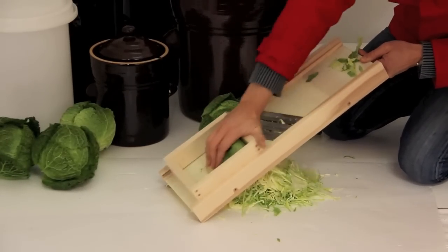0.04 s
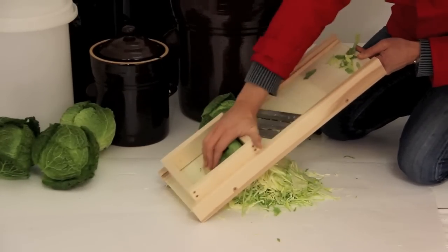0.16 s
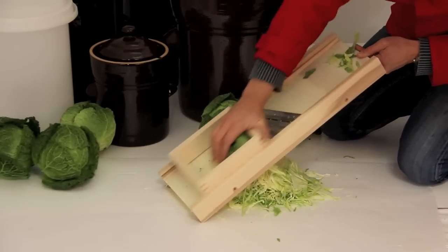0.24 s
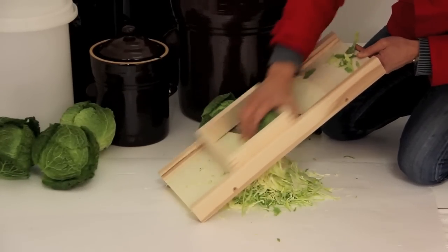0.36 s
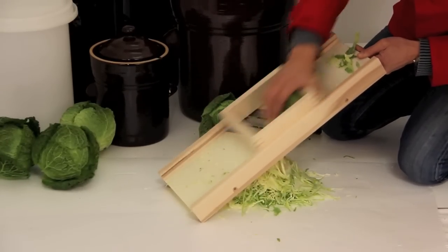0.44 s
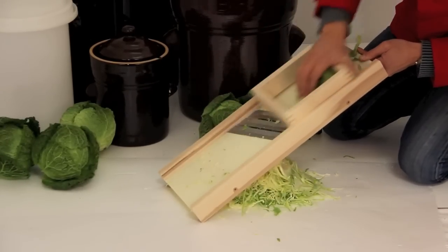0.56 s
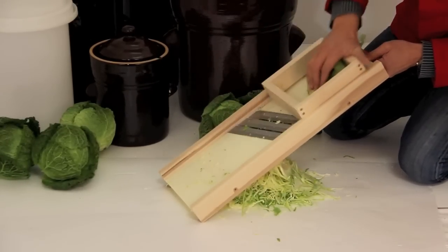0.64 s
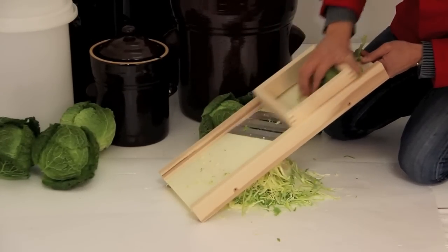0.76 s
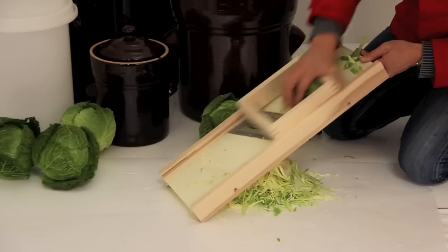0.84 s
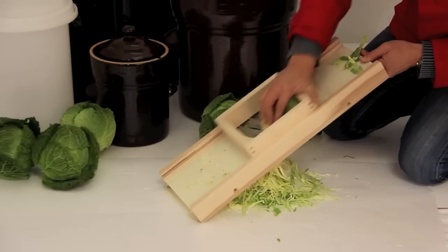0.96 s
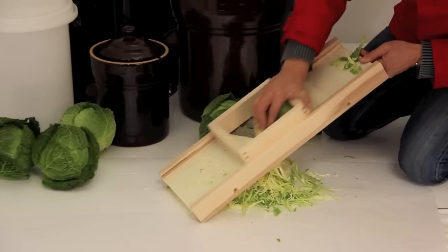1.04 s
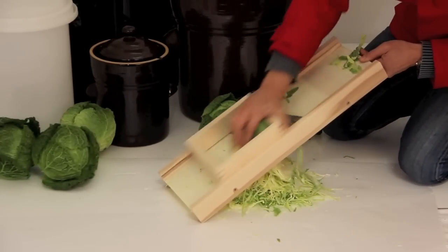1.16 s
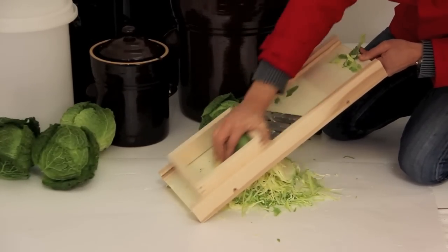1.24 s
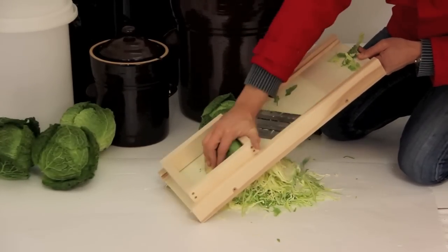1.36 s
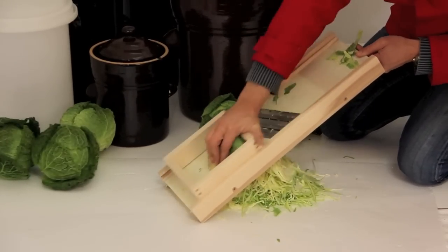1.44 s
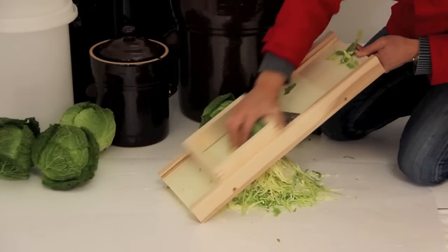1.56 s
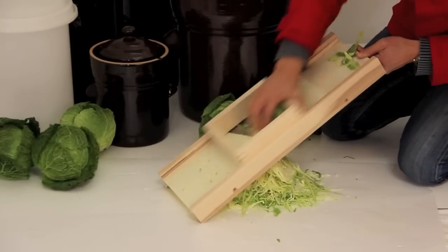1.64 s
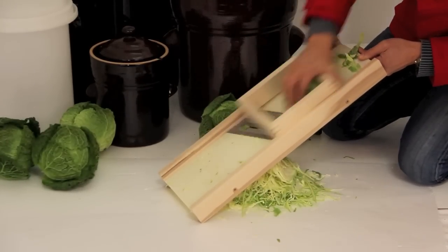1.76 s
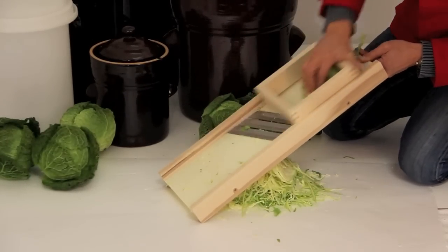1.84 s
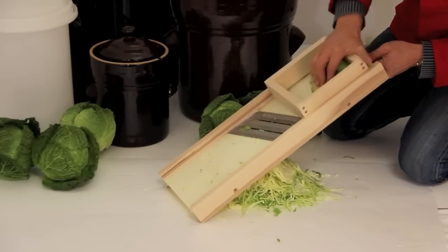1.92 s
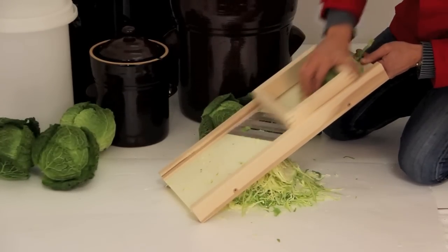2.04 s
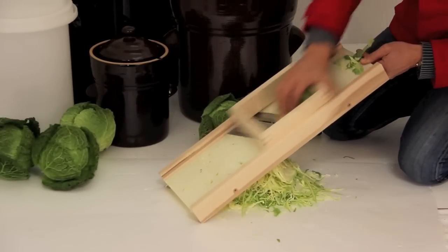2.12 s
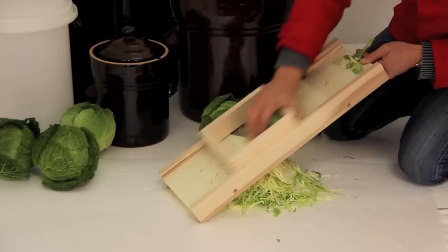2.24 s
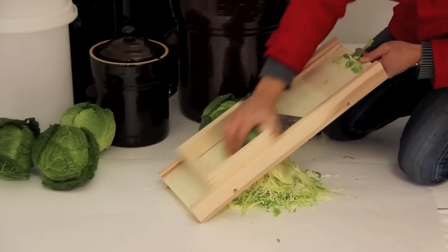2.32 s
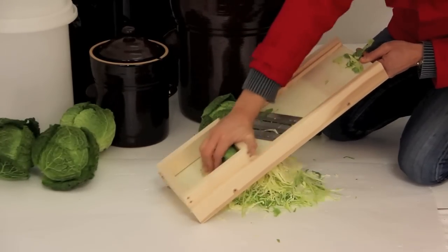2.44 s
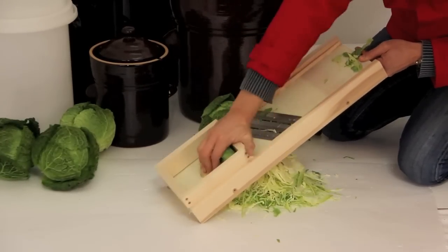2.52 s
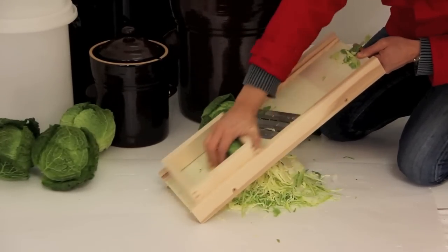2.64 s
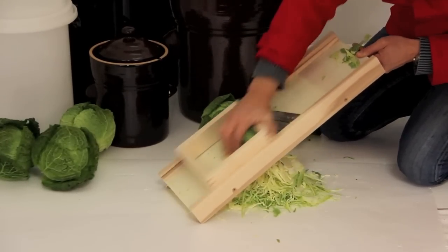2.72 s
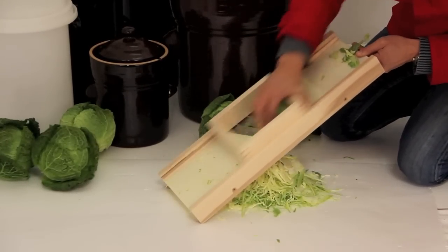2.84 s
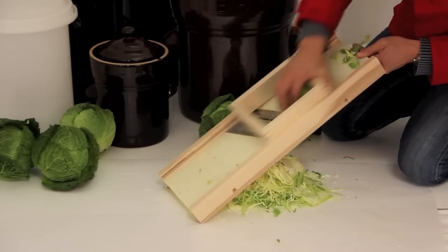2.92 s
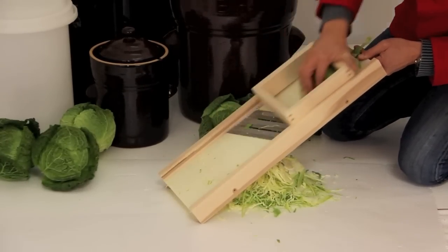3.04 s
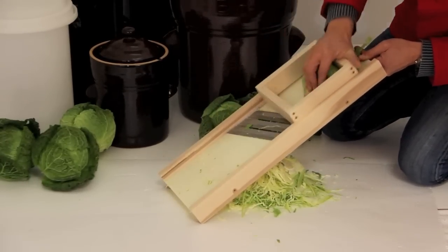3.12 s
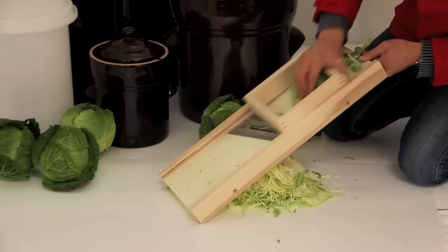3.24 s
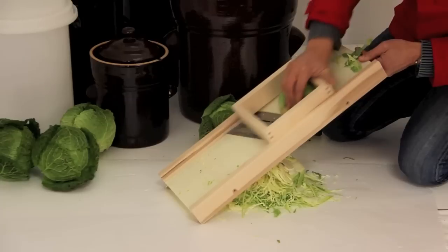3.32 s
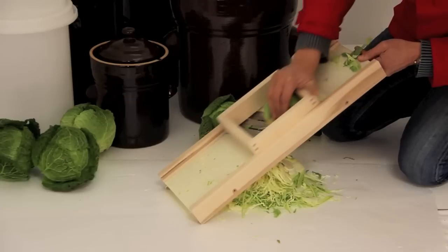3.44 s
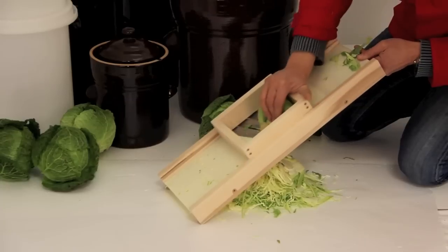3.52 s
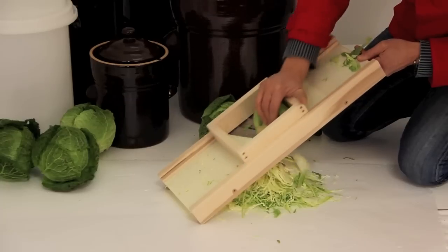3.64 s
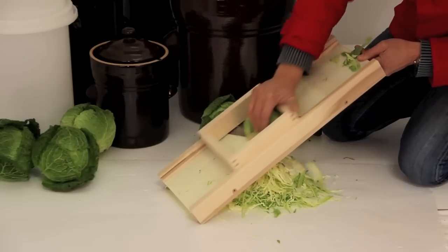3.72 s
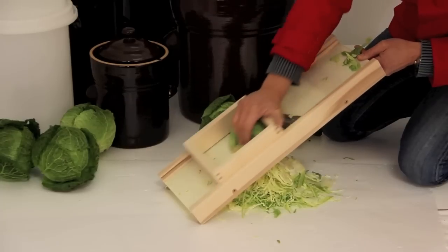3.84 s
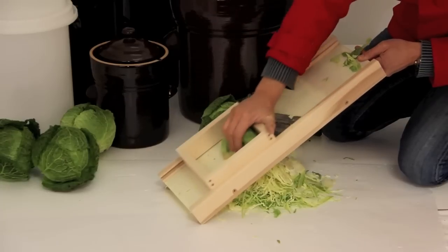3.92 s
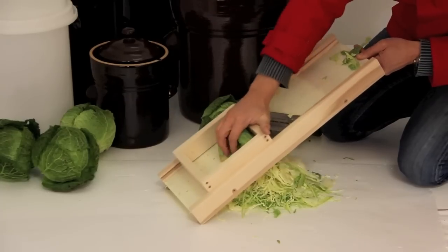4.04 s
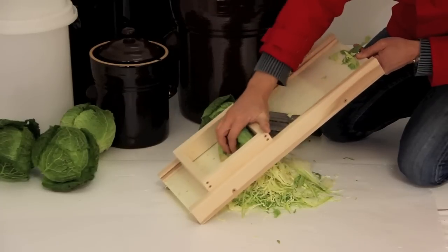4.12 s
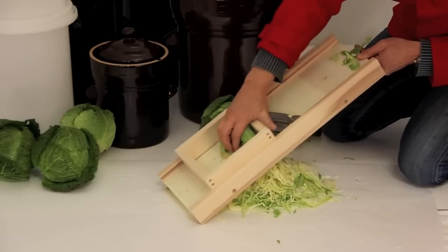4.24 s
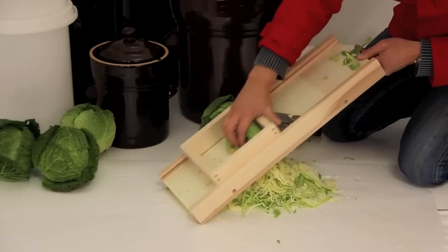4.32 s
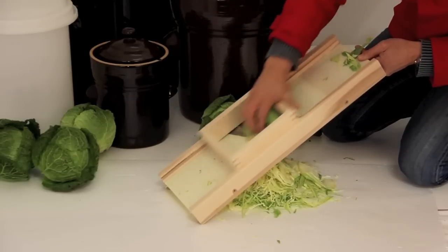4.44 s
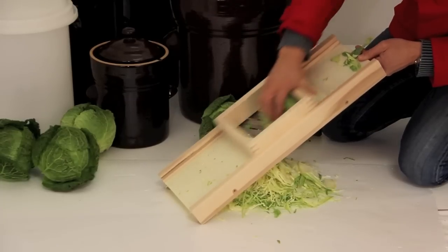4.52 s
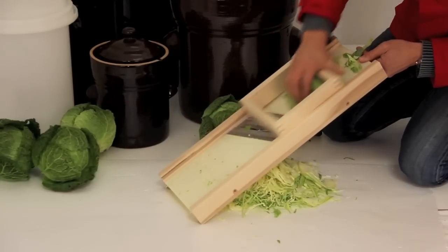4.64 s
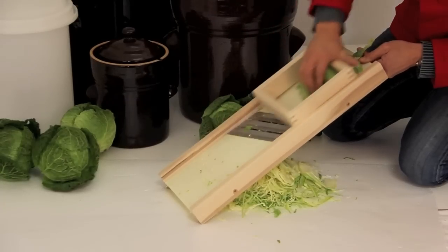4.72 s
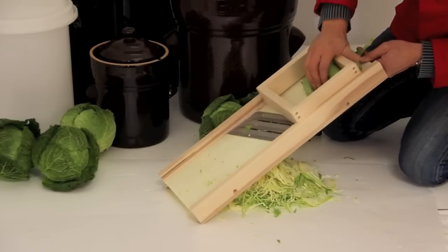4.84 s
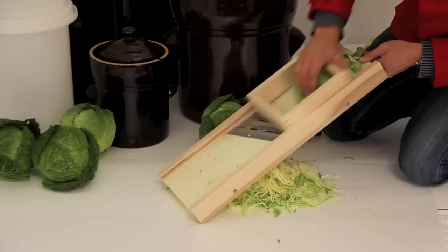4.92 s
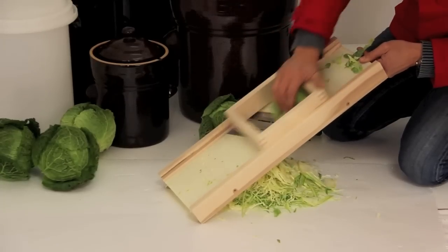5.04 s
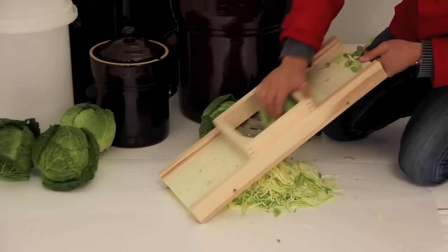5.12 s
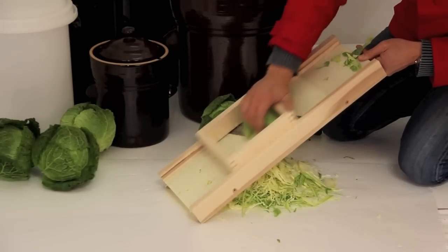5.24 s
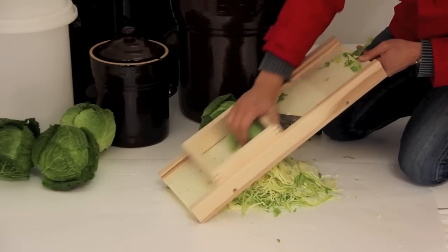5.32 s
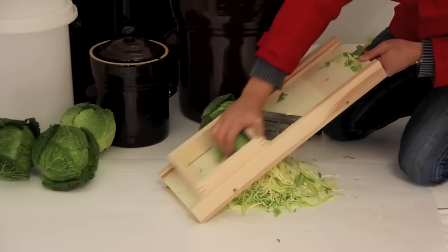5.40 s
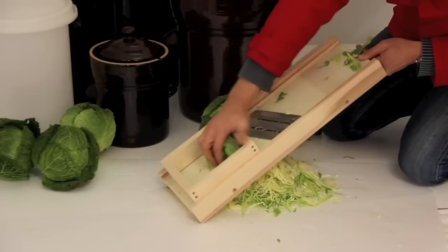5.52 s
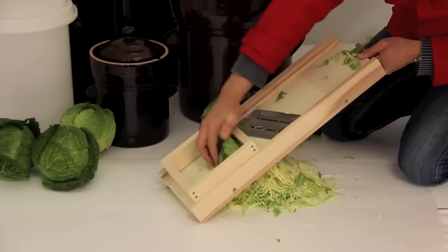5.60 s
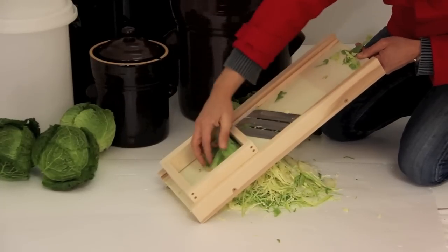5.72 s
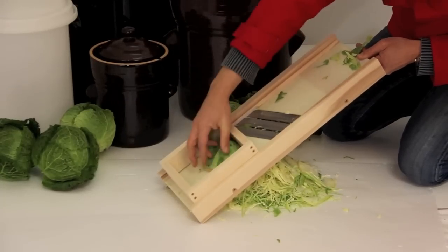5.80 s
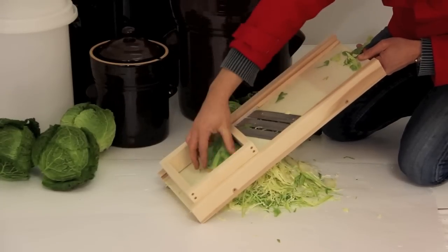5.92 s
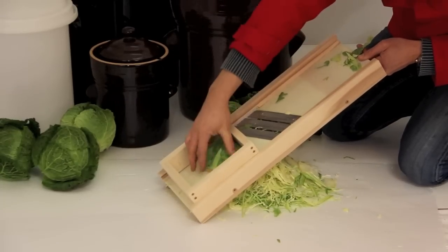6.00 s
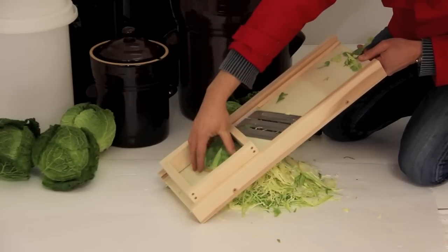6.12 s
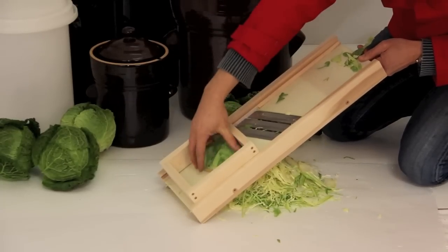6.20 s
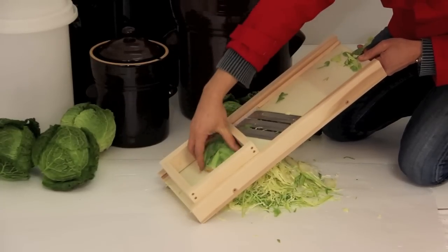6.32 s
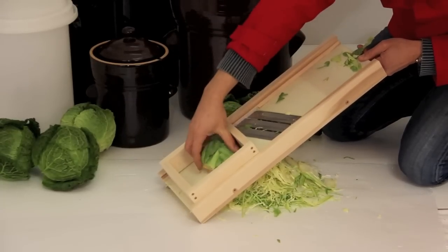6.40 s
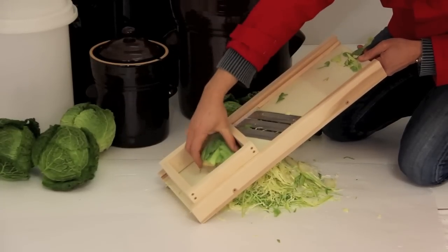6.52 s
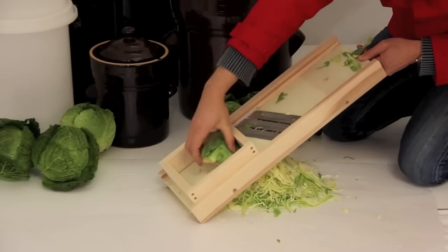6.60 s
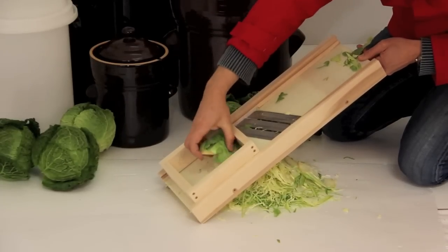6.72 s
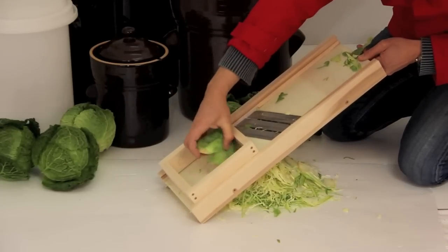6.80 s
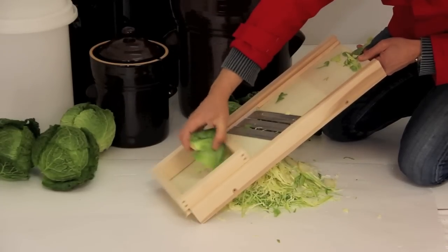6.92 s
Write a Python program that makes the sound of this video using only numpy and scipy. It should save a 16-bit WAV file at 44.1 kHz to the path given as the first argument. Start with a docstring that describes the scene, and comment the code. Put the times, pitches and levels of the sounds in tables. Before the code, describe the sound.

A cabbage is rasped back and forth on a wooden slicer board, crisp tearing cuts with sharp snaps, then quiet light knocks at the end.

```python
"""Slicing cabbage on a slanted board

A cabbage head in a wooden carriage slides up and down a slicer board in a small hard room.
Friction noise rings the rails, blades, leaves and foot; ribs snap and fibres tick as decaying bursts.
Scraped bands, a gliding leaf squeak and low shudders join in; at the end a hand turns the head over.
Noise lines and a mains tone make the appliance hum behind."""
import sys
import numpy as np
from scipy import signal
from scipy.fft import rfft, irfft, next_fast_len
from scipy.io import wavfile
from scipy.ndimage import uniform_filter1d, map_coordinates

SR = 44100
rng = np.random.default_rng(int(sys.argv[2]) if len(sys.argv) > 2 else 0)


def waveform_to_disk(signal):
    """Save audio, clipped to [-1, 1], as 16-bit WAV at the path in sys.argv[1]."""
    frames = np.transpose(np.atleast_2d(signal))
    scaled = np.clip(frames, -1, 1) * 32767
    samples = np.round(scaled).astype(np.int16)
    wavfile.write(sys.argv[1], SR, samples)


N = 306936  # length in samples
TOP_HZ = 15850  # band limit of the whole sound


def amp(db):
    """Gain of a level in dB."""
    return 10 ** (np.asarray(db) / 20)


def unit(x):
    """x at rms 1."""
    return x / np.sqrt(np.mean(x ** 2) + 1e-20)


def along(points, hz):
    """Read (frequency [Hz], value) points on a log frequency axis."""
    f, v = np.transpose(points)
    return np.interp(np.log(hz + 1), np.log(f + 1), v)


def curves(rows):
    """One value per sample for each column after the time."""
    s, *columns = np.transpose(rows)
    return [np.interp(np.arange(N) / SR, s, column) for column in columns]


def wobble(rate):
    """A smooth random curve, rate knots a second."""
    knots = rng.standard_normal(int(N * rate / SR) + 4)
    return map_coordinates(knots, [np.arange(N) * rate / SR])


def filtered(x, response):
    """x times a complex response of frequency."""
    m = next_fast_len(N + SR // 2)
    return irfft(rfft(x, m) * response(np.fft.rfftfreq(m, 1 / SR)), m)[:N]


def modes(table):
    """Causal response of a set of resonances, with alternating signs."""
    def response(f):
        return sum((-1) ** k * amp(db) * 1j * f * width / (hz * hz - f * f + 1j * f * width)
                   for k, (hz, width, db) in enumerate(table))
    return response


def friction(slips, spread_db, share, lumps_db):
    """Tiny slips of unequal size, slips a second, over a smooth rub; the pressure comes in lumps."""
    draw = rng.random((3, N))
    size_db = np.minimum(-spread_db * np.log(draw[1] + 1e-9), 11)
    size = amp(size_db) * np.sign(draw[2] - .5)
    grains = unit((draw[0] < slips / SR) * size)
    share = np.clip(share, 0, 1)  # power share of the grains
    rub = np.sqrt(share) * grains + np.sqrt(1 - share) * rng.standard_normal(N)
    lumps = amp(lumps_db * (wobble(70) + wobble(25.02)))
    return unit(rub * lumps)


def crunches(rate, spread_db, t60):
    """Gain of a pressure that jumps as each rib gives way, then eases off."""
    draw = rng.random((2, N))
    size_db = np.minimum(-spread_db * np.log(draw[1] + 1e-9), 9)
    jumps = (draw[0] < rate / SR) * amp(size_db)
    ease = amp(-60 / (t60 * SR))
    return unit(np.sqrt(.5 + signal.lfilter([1], [1, -ease], jumps)))


def sliding(force, level_db, table, shift_db):
    """A moving contact drives each mode more or less, as it passes loops and nodes."""
    drive = force * amp(level_db)
    rings = []
    for k, row in enumerate(table):
        coupling = unit(amp(shift_db * wobble(24)))
        rings.append((-1) ** k * filtered(drive * coupling, modes([row])))
    return sum(rings) / np.std(filtered(force, modes(table)))


def played(force, level_db, response):
    """The force, at its level, set ringing in a body."""
    scale = np.std(filtered(force, response))
    return filtered(force * amp(level_db), response) / scale


def joined(tables, catch=.007):
    """Tables in a row; each last level holds until catch seconds before the next table."""
    rows = []
    for this, after in zip(tables, tables[1:]):
        rows += [*this, (after[0][0] - catch, *this[-1][1:])]
    return rows + [*tables[-1]]


# One breakpoint list from each catch of the carriage or head to the next:
# (time [s], rasp on the rails [dB], tearing of the leaves [dB])
STROKE_CURVES = [
    [(0.0, -22.5, -33), (0.068, -36, -40.5), (0.262, -56.5, -71.5), (0.36, -46.5, -51.5)],
    [(0.385, -32, -37.5), (0.417, -30, -37), (0.445, -32, -45.5), (0.469, -28.5, -45), (0.55, -36, -49.5)],
    [(0.574, -28, -34.5), (0.592, -28, -39.5), (0.628, -33.5, -50.5), (0.78, -48, -61.5), (0.9, -48.5, -58)],
    [(0.925, -34.5, -58), (1.021, -42.5, -36), (1.041, -42.5, -30), (1.09, -35.5, -31),
     (1.125, -36.5, -35.5), (1.16, -35.5, -33), (1.303, -35, -37.5), (1.321, -32.5, -41), (1.355, -38, -52),
     (1.455, -44.5, -50.5), (1.475, -50.5, -64), (1.561, -49.5, -61), (1.585, -46, -53)],
    [(1.607, -38, -37), (1.655, -31, -36.5), (1.687, -34, -47), (1.869, -32, -48), (2.037, -54, -58.5),
     (2.073, -44.5, -75), (2.165, -49, -53), (2.2, -41, -52)],
    [(2.222, -47, -44), (2.294, -37, -30.5), (2.428, -35, -41.5), (2.454, -32, -45.5), (2.586, -48, -61.5),
     (2.63, -52.5, -71), (2.728, -46.5, -60), (2.79, -50, -55.5)],
    [(2.813, -37, -42), (2.855, -31.5, -45), (2.885, -37, -47.5), (3.079, -35, -50.5),
     (3.223, -55.5, -62.5), (3.278, -51, -62)],
    [(3.302, -36, -61), (3.34, -49, -60), (3.368, -41, -59)],
    [(3.395, -31, -64), (3.449, -39.5, -41), (3.513, -41, -46), (3.571, -42.5, -36), (3.655, -48, -44),
     (3.759, -40, -39), (4.005, -38, -48), (4.04, -46, -57.5), (4.161, -54.5, -63.5), (4.34, -55.5, -60.5)],
    [(4.368, -33.5, -64), (4.398, -43, -64), (4.572, -43.5, -52), (4.71, -34.5, -54.5),
     (4.904, -56.5, -61.5), (4.91, -52.5, -45.5), (4.946, -63, -64), (5.002, -48, -61.5),
     (5.104, -46.5, -61), (5.113, -41, -49)],
    [(5.131, -30.5, -44.5), (5.189, -37.5, -51.5), (5.211, -37.5, -42), (5.437, -36.5, -44),
     (5.455, -29, -45.5), (5.569, -46, -56.5), (5.677, -52, -61), (5.73, -55, -64)],
    [(5.77, -61, -57), (5.794, -49, -53), (5.854, -65, -63), (6.106, -65.5, -90), (6.496, -62.5, -66),
     (6.556, -57, -64), (6.58, -65, -62)],
    [(6.603, -49.5, -50), (6.673, -53.5, -52), (6.781, -58, -56), (6.801, -46.5, -59), (6.833, -59, -59),
     (6.89, -58, -49.5), (6.9, -43.5, -60), (6.943, -54, -48), (6.96, -54, -57)],
]
# How hard each stroke drives the other bodies, one row per list above, added to the growth below:
# (bite [dB], crunch [dB], drumming [dB], deep shake [dB])
STROKE_DRIVE = [(7, 2, -11, -9.5), (4.5, 3, -10.5, -10.5), (6.5, 1, -10, -10), (7.5, 2.5, -13, -9),
                (5, 1, -10.5, -9), (7, 2.5, -10, -8), (7, 4, -9, -11), (4, 3.5, -10, -18),
                (7, 1.5, -11, -9), (4.5, 2.5, -10, -9), (5.5, -0.5, -10, -7.5), (8.5, 6.5, -7.5, -10),
                (3.5, 3, -13.5, -23)]
# dB gained per dB of (rasp, tearing)
BITE_GROWS, CRUNCH_GROWS, DRUM_GROWS, SHAKE_GROWS = (0.67, 0.42), (0.41, 0.62), (0.77, 0.13), (0.48, 0.57)
FOOT_SMEAR_S = 0.044  # the heavy table follows the push slowly


def stroke_levels():
    """Rasp and tearing set all the other levels, each stroke with its own weight."""
    rasp_db, tear_db = curves(joined(STROKE_CURVES))
    starts = [rows[0][0] for rows in STROKE_CURVES[1:]]
    stroke = np.searchsorted(starts, np.arange(N) / SR)
    bite, crunch, drum, shake = np.transpose(STROKE_DRIVE)[:, stroke]

    def growth(grows):
        return grows[0] * rasp_db + grows[1] * tear_db

    def slow(db):
        return uniform_filter1d(db, size=max(int(FOOT_SMEAR_S * SR), 1))

    return dict(rasp=rasp_db, tear=tear_db,
                bite=bite + growth(BITE_GROWS), crunch=crunch + growth(CRUNCH_GROWS),
                drum=slow(drum + growth(DRUM_GROWS)), shake=slow(shake + growth(SHAKE_GROWS)))


# Lower wood resonances, rasped on the rails: (frequency [Hz], width [Hz], relative level [dB])
RAIL_MODES = [(377, 183, -11), (451.6, 51, -3), (523, 39, -3), (659, 65, -2.5), (702.4, 38.7, 3),
              (797, 185, 0.5), (876, 76, 1.5), (1030, 63, -6.5)]
# Higher board resonances, shaken by the blades: (frequency [Hz], width [Hz], relative level [dB])
BLADE_MODES = [(1125, 123, -4), (1285, 44, 4), (1344, 136, 2), (1457, 177, 3), (1683, 117, -0.5),
               (1934, 280, -5), (2278, 64, -6.5)]


def carriage(ribs, rasp_db, bite_db):
    """Wood chatters along the rails; the blades bite into the head and shake the board's higher modes."""
    chatter = ribs ** 0.27 * friction(900, spread_db=4.0, share=0.49, lumps_db=-0.78)
    cutting = ribs * friction(1200, spread_db=10.0, share=0.4, lumps_db=-0.07)
    rasp = sliding(chatter, rasp_db, RAIL_MODES, shift_db=2.0)
    bite = sliding(cutting, bite_db, BLADE_MODES, shift_db=1.5)
    return rasp + bite + scrapes(bite_db)


# The blades catch or the carriage jams, and one part of the board's range is scraped hard:
# (time [s], pitch [Hz], level before the fade [dB], t60 [s])
HARD_SCRAPES = [(.405, 1060, -24, 0.16), (.462, 667, -21, 0.15), (.8, 1700, -41, .12),
                (.95, 1390, -36, 0.42), (1.037, 1320, -16, 0.14), (1.068, 1410, -16.5, 0.08),
                (1.088, 1200, -19.5, .08), (1.305, 437, -32, 0.22), (2.217, 1360, -29, 0.39),
                (2.3, 2880, -29, 0.21), (2.44, 460, -26.5, 0.14), (2.558, 2900, -43, .1),
                (2.845, 605, -26, 0.26), (3.39, 1360, -31, 0.62), (3.395, 760, -26.5, 0.25),
                (3.985, 1400, -35.5, 0.54), (4.262, 4540, -55, 0.18), (4.365, 1310, -28, 0.11),
                (5.13, 750, -32, 0.29), (5.175, 710, -25.5, 0.09), (5.24, 554, -26.5, 0.13),
                (5.465, 2220, -32, 0.18), (5.47, 1340, -33, 0.22), (5.655, 654, -37.5, 0.22)]
SCRAPE_WIDTH, SCRAPE_RISE_S = 0.29, 0.0033  # band width over pitch; time constant of the rise
SHRED_RATE, SHRED_T60_S = 45, 0.028  # shreds a second, their fade
SHRED_HZ, SHRED_SPAN_DB = 1510, 5  # middle pitch; spread of pitch, as 20 log10 of the ratio
SHRED_DB = 4.5  # middle level over the bite


def scrapes(bite_db):
    """Quick-rising, fading rubs around a pitch; small ones come at random as shreds tear off and settle."""
    out, t = np.zeros(N + SR), np.arange(SR // 3) / SR
    f = np.fft.rfftfreq(len(t), 1 / SR)
    at = np.flatnonzero(rng.random(N) < SHRED_RATE / SR)
    pitch_draw, level_draw = rng.standard_normal((len(at), 2)).T
    shred_hz = SHRED_HZ * amp(SHRED_SPAN_DB * pitch_draw)
    shred_db = bite_db[at] + SHRED_DB + 3 * level_draw
    shreds = zip(at / SR, shred_hz, shred_db, [SHRED_T60_S] * len(at))
    for s, hz, db, t60 in [*HARD_SCRAPES, *shreds]:
        band = modes([(hz, SCRAPE_WIDTH * hz, 0)])(f) ** 2
        rub = unit(irfft(rfft(rng.standard_normal(len(t))) * band, len(t)))
        envelope = amp(db - 60 * t / t60) * (1 - np.exp(-t / SCRAPE_RISE_S))
        out[round(s * SR):][:len(t)] += envelope * rub
    return out[:N]


# Bright resonances of tearing leaves: (frequency [Hz], width [Hz], relative level [dB])
TEAR_MODES = [(4000, 1800, -0.5), (6760, 1530, 3.5), (9050, 4000, 1), (13800, 11500, -4)]
# Resonances of the firm core: (frequency [Hz], width [Hz], relative level [dB])
CORE_MODES = [(2420, 490, 2.5), (3560, 1800, -3.5)]


def leaves(ribs, tear_db, crunch_db):
    """Bursting cells: heard bare as tearing, and through the firm core as crunch."""
    tear = ribs ** 0.81 * friction(3000, spread_db=3.0, share=0.37, lumps_db=-0.44)
    crunch = ribs ** 0.82 * friction(1500, spread_db=1.5, share=0.36, lumps_db=1.13)
    tearing = sliding(tear, tear_db, TEAR_MODES, shift_db=1.5)
    return tearing + sliding(crunch, crunch_db, CORE_MODES, shift_db=1.5)


# Ribs snapping and wood knocking; push and crackle are relative to the snap, before fixed boosts:
# (time [s], snap level [dB], snap pitch [Hz], push on the board [dB], crackle [dB])
RIB_SNAPS = [(0.569, -15, 2560, -5, -11.5), (0.9193, -24.5, 4000, -6.5, -27), (1.037, -26, 3070, -1, -5),
             (1.0701, -16.5, 3170, -3, -3.5), (1.3061, -22.5, 2600, 4, -21), (1.603, -20, 6200, -18, -15),
             (1.816, -18, 3200, -7, -14), (1.8551, -11, 2470, -29, -17), (2.0706, -37.5, 3380, 3.5, -23),
             (2.2155, -21.5, 2950, 2, -16), (2.2983, -20, 2700, -11, -25), (2.309, -14, 2800, -10, -20),
             (2.4318, -15.5, 2570, -4, -12.5), (2.8391, -16, 3400, -4, -11), (2.9589, -18, 2850, -7, -17),
             (2.995, -18.5, 3480, 0.5, -9), (3.0339, -22.5, 2800, 1.5, -13.5),
             (3.0703, -13, 2840, -12.5, -20), (3.298, -26.5, 2980, -17, -11.5),
             (3.3884, -19.5, 2760, -1.5, -30), (3.41, -18.5, 2000, -7, -29), (3.5414, -13, 2700, -11, -23),
             (3.7612, -19, 3400, -14, -10.5), (4.3623, -10, 3050, -16, -31), (4.913, -39, 3960, -24, -4),
             (5.1251, -19, 3500, -15, -17), (5.406, -17, 3570, -11, -16), (5.241, -35, 2980, -7, -15),
             (5.449, -31.5, 3000, 8.5, -16), (5.463, -21, 3500, 0.5, -14), (5.753, -24, 3100, -14, -15.5),
             (6.549, -31, 4170, -16, -10), (6.5987, -30.5, 4500, -6.5, -7), (6.626, -28, 3260, -9, -10),
             (6.755, -33.5, 2550, -10, -9.5), (6.896, -46, 2500, -2, -15), (6.9323, -25, 3330, -16, -12.5)]


def snaps():
    """Each snap is a few cycles at its own pitch with a crackle behind it, and a push on the wood."""
    air, push, t = np.zeros(N + SR), np.zeros(N + SR), np.arange(SR // 20) / SR
    for s, db, hz, wood_db, crackle_db in RIB_SNAPS:
        start = round(s * SR)
        ping = 1.08 * np.sin(2 * np.pi * hz * t) * amp(-60 * t / 0.0049) * (1 - np.exp(-t / 0.00012))
        crackle = amp(crackle_db + 6.5 - 60 * t / 0.04) * rng.standard_normal(len(t))
        air[start:][:len(t)] += amp(db) * (ping + crackle)
        thud = amp(db + wood_db + 12.5 - 60 * t / 0.038) * rng.standard_normal(len(t))
        push[start:][:len(t)] += thud
    thin = filtered(air[:N], modes([(3900, 2850, 0)]))  # small things radiate no bass
    return thin + filtered(push[:N], modes(RAIL_MODES + BLADE_MODES))


# Single fibres parting, too light to move the wood: (time [s], level before the filter [dB], pitch [Hz])
FIBRE_TICKS = [(0.952, -30, 4200), (1.497, -38, 7000), (1.505, -39, 7200), (1.5095, -41, 7500),
               (2.809, -29, 3500), (3.432, -27, 4000), (3.709, -31, 8000), (4.637, -33, 8000),
               (4.702, -35, 9300), (4.812, -39, 6800), (6.478, -40, 5000), (6.488, -38, 4940),
               (6.5574, -38, 5000), (6.563, -41, 7500), ]
TICK_T60_S, TICK_NOISE = 0.0076, 0.75  # fade; noise mixed with the tone
# Leaves creak in the turning hand: start, length, mean clicks a second before uneven spacing
CREAK_S, CREAK_LENGTH_S, CREAK_RATE = 6.632, .072, 170
CREAK_DB, CREAK_HZ = -36, 6570  # middle level and pitch
FIBRE_RATE = 140  # random fibres a second
FIBRE_DB, FIBRE_SPREAD_DB, FIBRE_HZ = 3.5, 1.5, 4520  # least level over the tearing, spread, middle pitch


def ticks(tear_db):
    """Very short bright clicks: single, in an uneven creaking run, and scattered through the tearing."""
    out, t = np.zeros(N + SR), np.arange(SR // 50) / SR
    draw = rng.standard_normal((30, 3))
    times = CREAK_S + np.cumsum(amp(3.2 * draw[:, 0])) / CREAK_RATE
    creak = [(s, CREAK_DB + 3 * level_draw, CREAK_HZ * amp(0.93 * pitch_draw))
             for s, (_, level_draw, pitch_draw) in zip(times, draw) if s < CREAK_S + CREAK_LENGTH_S]
    at = np.flatnonzero(rng.random(N) < FIBRE_RATE / SR)
    extra_db = FIBRE_SPREAD_DB * np.minimum(rng.exponential(size=len(at)), 2)
    fibre_db = tear_db[at] + FIBRE_DB + extra_db
    fibre_hz = np.minimum(FIBRE_HZ * amp(4.03 * rng.standard_normal(len(at))), TOP_HZ)
    for s, db, hz in [*FIBRE_TICKS, *creak, *zip(at / SR, fibre_db, fibre_hz)]:
        crack = np.sin(2 * np.pi * hz * t) + TICK_NOISE * rng.standard_normal(len(t))
        out[round(s * SR):][:len(t)] += amp(db - 60 * t / TICK_T60_S) * crack
    return filtered(out[:N], modes([(7000, 13000, 0)]))


# A waxy leaf squeaking on the smooth board, levels before the flutter:
# (start [s], length [s], level of the upper band [dB], first pitch [Hz], last pitch [Hz])
LEAF_SQUEAKS = [(.925, 0.098, -50, 4230, 4100), (1.875, 0.1, -48.5, 4000, 3850),
                (2.115, 0.14, -48.5, 3820, 4150), (4.639, .27, -50, 4060, 3880),
                (5.0, 0.12, -53.5, 3930, 3860)]
SQUEAK_WIDTH_HZ = 240  # sets how fast the band's fuzz varies
PARTNER, PARTNER_DB = .76, -1.5  # the lower partner: pitch share, relative level


def whistle():
    """A rough band gliding in pitch, with a partner below, that swells only while the leaf slides."""
    out = np.zeros(N)
    for s, length, db, first_hz, last_hz in LEAF_SQUEAKS:
        start, n = round(s * SR), round(length * SR)
        turns = 2 * np.pi * np.cumsum(np.linspace(first_hz, last_hz, n)) / SR
        noise = rng.standard_normal((4, SR))[:, :n]
        fuzz = uniform_filter1d(noise, size=int(SR / SQUEAK_WIDTH_HZ / 2), axis=1)

        def band(p, q, share):
            return unit(p * np.cos(share * turns) + q * np.sin(share * turns))

        both = band(*fuzz[:2], 1.0) + amp(PARTNER_DB) * band(*fuzz[2:], PARTNER)
        out[start:start + n] += amp(db) * np.hanning(n) ** 0.58 * both
    return out * amp(2.5 * wobble(60))  # the leaf sticks and slips


# Resonances of the table top: (frequency [Hz], width [Hz], relative level [dB])
TABLE_MODES = [(127, 38, -9), (168, 15.4, -0.5), (214.8, 17, 2), (277, 49, -12)]
# Deep resonances of the table legs: (frequency [Hz], width [Hz], relative level [dB])
LEG_MODES = [(78, 22, 4.5), (111, 60, -5.5)]


def foot(drum_db, shake_db):
    """The push of each stroke passes down the board into the table top and legs."""
    drumming = friction(150, spread_db=4.0, share=0.14, lumps_db=0.0)
    shaking = friction(80, spread_db=0.5, share=0.31, lumps_db=-2.0)
    drum = played(drumming, drum_db, modes(TABLE_MODES))
    return shudders() + drum + played(shaking, shake_db, modes(LEG_MODES))


# The foot shudders on the table and one low mode swells, pitch and level before their wavering:
# (middle [s], length [s], pitch [Hz], peak level [dB])
FOOT_SHUDDERS = [(0.101, 0.24, 214.4, -43), (.65, 0.22, 159, -40), (1.09, 0.16, 80, -39),
                 (1.25, 0.13, 81, -44), (1.661, 0.121, 74.6, -41.5), (1.878, .12, 74.6, -39),
                 (1.96, .16, 158, -41), (2.331, .12, 89.2, -44), (3.18, 0.26, 161, -42),
                 (3.71, 0.089, 126, -38), (3.785, 0.13, 96.3, -34), (4.41, 0.13, 181, -40.5),
                 (4.73, .16, 155, -43), (6.904, 0.068, 227, -46.5)]


def shudders():
    """Each shudder is one wavering, uneven low tone that swells quickly and fades slowly."""
    out = np.zeros(N + SR)
    waver = np.pad(1 + 0.032 * wobble(25), (0, SR), "edge")
    for s, length, hz, db in FOOT_SHUDDERS:
        start, n = max(round((s - length / 2) * SR), 0), round(length * SR)
        swell = np.sin(np.pi * np.linspace(0, 1, n) ** .7) ** 2
        tone = np.sin(2 * np.pi * hz * np.cumsum(waver[start:start + n]) / SR)
        out[start:start + n] += amp(db) * swell * tone
    return out[:N] * amp(2.0 * wobble(29.98))


# Decay of the small hard room: (frequency [Hz], t60 [s])
WALL_DECAY = [(100, 0.43), (1000, 0.31), (4000, 0.22), (12000, 0.04)]


def room(x):
    """Each frequency of the walls' answer dies at its own speed."""
    hz, t, z = signal.stft(rng.standard_normal(SR // 2), SR, nperseg=256)
    decay = amp(-60 * t / along(WALL_DECAY, hz)[:, None])
    tail = signal.istft(z * decay, SR, nperseg=256)[1]
    late = np.pad(x, (150, 0))  # samples before the answer
    return signal.fftconvolve(late, tail / np.linalg.norm(tail))[:N]


# Spectral shape of the steady hiss: (frequency [Hz], relative density [dB per Hz])
HISS_SHAPE = [(20, -11), (60, -19), (110, -11), (200, -23), (270, -14.5), (700, -14.5), (1250, -11),
              (1750, -18), (2300, -18.5), (5000, -23), (16000, -30)]
HISS_DB = -54.5  # rms of the hiss
# Fuzzy lines of the humming appliance: (frequency [Hz], width [Hz], rms level [dB])
HUM_LINES = [(612.7, 13, -60), (820, 10, -65.5), (1197, 6.2, -68.5), (2180, 7.7, -69)]
MAINS_HZ, MAINS_DB = 120, -62.5  # mains tone; middle of its slightly wavering peak level


def background():
    """Shaped steady hiss, with the mains tone and narrow noise lines of a humming appliance."""
    air = filtered(rng.standard_normal(N), lambda hz: amp(along(HISS_SHAPE, hz)))
    hiss = amp(HISS_DB) * unit(air)
    lines = [amp(db) * unit(filtered(rng.standard_normal(N), modes([(hz, width, 0)])))
             for hz, width, db in HUM_LINES]
    mains_level = amp(MAINS_DB + 0.74 * wobble(2.74))
    mains = mains_level * np.sin(2 * np.pi * MAINS_HZ * np.arange(N) / SR)
    return hiss + sum(lines) + mains


def scene():
    """Slicer, room and background; the sharp sounds excite the room more than the steady ones."""
    ribs = crunches(110, spread_db=0.5, t60=0.11)
    db = stroke_levels()
    steady = carriage(ribs, db["rasp"], db["bite"]) + leaves(ribs, db["tear"], db["crunch"])
    steady = steady + whistle() + foot(db["drum"], db["shake"])
    sharp = snaps() + ticks(db["tear"])
    answer = room(amp(-16) * steady + amp(-7.5) * sharp)
    return (steady + sharp + answer + background())[None]


def record(dry):
    """A small constant offset, and nothing above the band limit."""
    return filtered(dry[0] + 0.00098, lambda hz: hz < TOP_HZ)[None]


dry = scene()
out = record(dry)
waveform_to_disk(out)
```